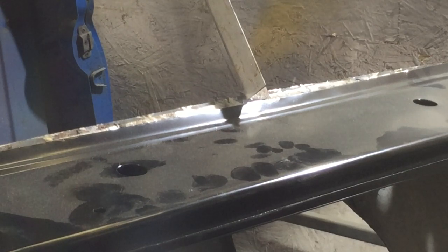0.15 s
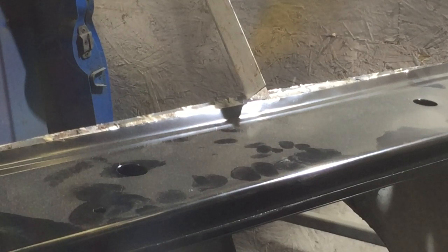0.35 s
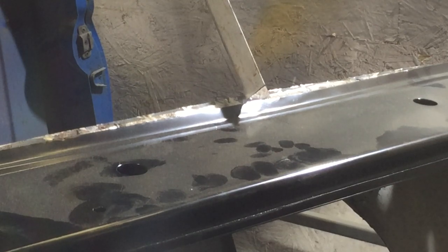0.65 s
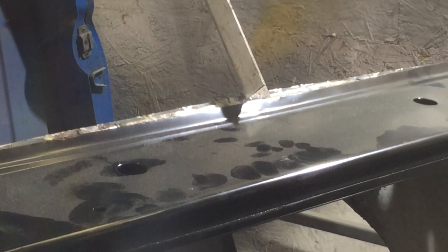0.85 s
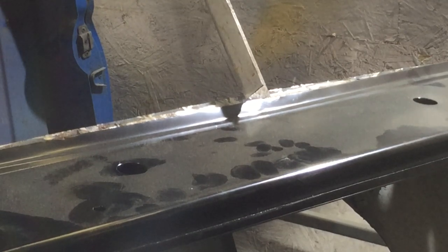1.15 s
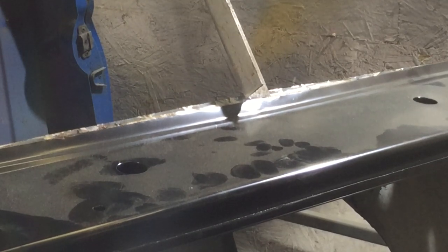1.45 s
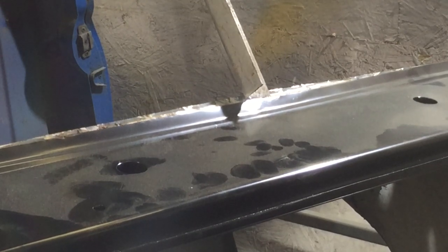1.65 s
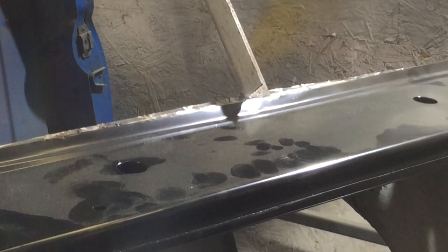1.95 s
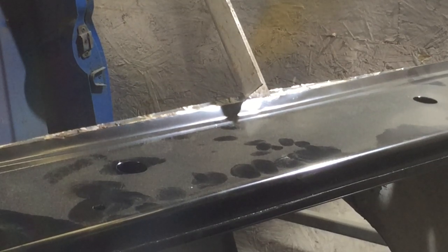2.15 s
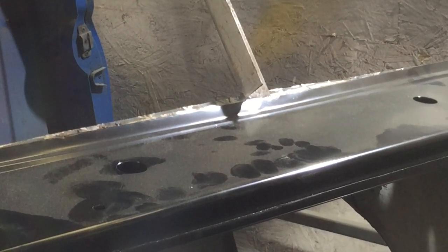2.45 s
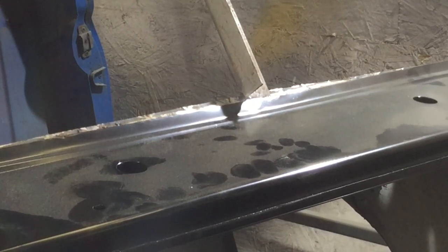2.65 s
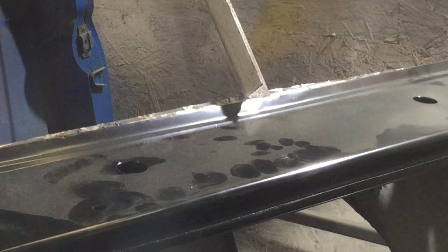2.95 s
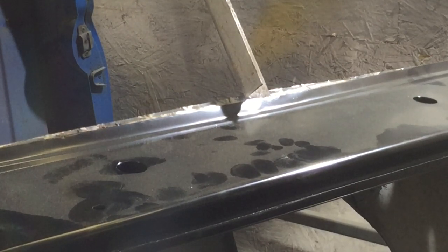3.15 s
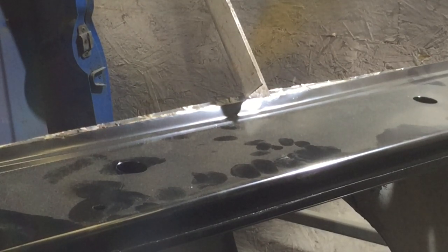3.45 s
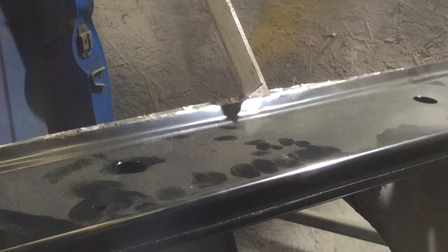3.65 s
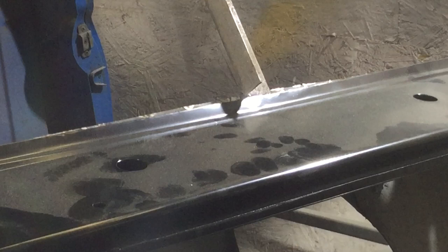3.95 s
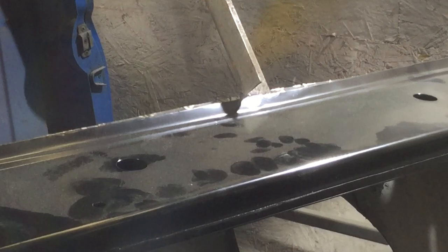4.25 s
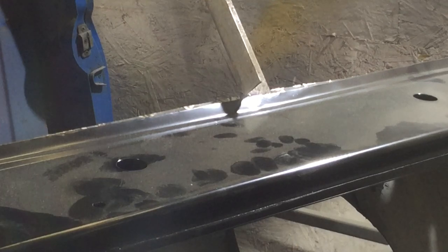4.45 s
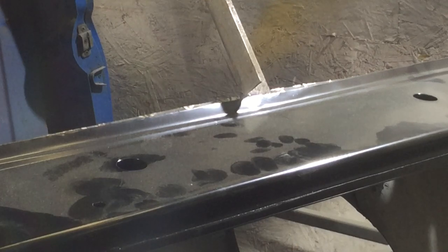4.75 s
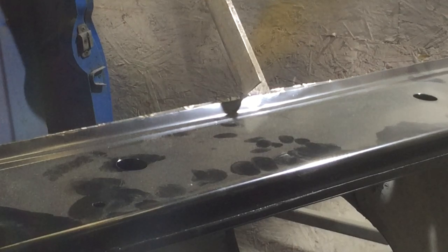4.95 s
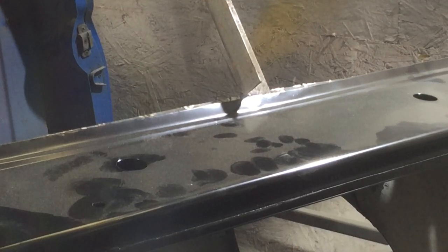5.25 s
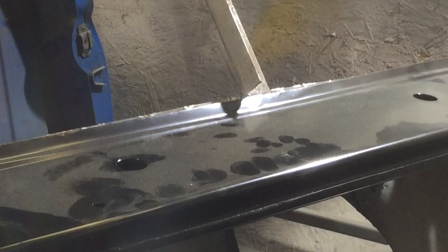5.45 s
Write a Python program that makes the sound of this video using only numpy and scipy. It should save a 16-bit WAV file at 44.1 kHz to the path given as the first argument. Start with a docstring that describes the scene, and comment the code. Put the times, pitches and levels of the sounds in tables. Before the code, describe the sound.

Faint ticks come from a seam in a car body under load. A jack handle clinks in its steel linkage, and the shell suddenly slips with a loud metallic bang. After smaller ticks, knocks and clinks it bangs again, leaving a brief low ring. Heard through one microphone on the metal, the workshop behind it is quiet, with an uneven hum, soft thuds and slight hiss.

```python
"""A workshop, one microphone on a car body being lifted with a hand-pumped jack.
The loaded sheet-metal shell slips, ticks at a seam and twice lets go with a bang; the pump handle
clinks in its steel linkage. Each contact rings the metal's resonances, the bass dying last.
The frame's low, uneven ring swells and fades, mostly just after knocks. Behind it all are a few
soft thuds, the low, uneven hum of the room and a faint microphone hiss."""
import sys
import numpy as np
from scipy import signal
from scipy.fft import rfft, irfft, next_fast_len
from scipy.io import wavfile
from scipy.ndimage import uniform_filter1d

SR = 44100
rng = np.random.default_rng(int(sys.argv[2]) if len(sys.argv) > 2 else 0)


def master(y):
    """Save y as 16-bit WAV."""
    cut = np.clip(np.atleast_2d(y).T, -1, 1)
    pcm = np.round(cut * 32767)  # scale
    wavfile.write(sys.argv[1], SR, pcm.astype(np.int16))


N = 246959


def amp(db):
    """Gain of a level in dB."""
    return 10 ** (np.asarray(db) / 20)


def unit(x):
    """Scaled to rms 1."""
    return x / np.sqrt(np.mean(x ** 2) + 1e-20)


def along(points, hz):
    """Rows of (f/Hz, value) read on a log frequency axis."""
    f, value = np.transpose(points)
    return np.interp(np.log(hz + 1), np.log(f + 1), value)


def filtered(x, response):
    """x through a filter whose gain at f Hz is response(f)."""
    size = next_fast_len(len(x) + 8192)
    return irfft(rfft(x, size) * response(np.fft.rfftfreq(size, 1 / SR)), size)[:len(x)]


def patchy(depth_db, bins, frames):
    """Noise whose level wavers in random patches, bins wide and frames long."""
    spectra = signal.stft(rng.standard_normal(N + 1024), nperseg=1024)[2]
    patches = uniform_filter1d(rng.standard_normal(spectra.shape), bins, axis=0)
    patches = uniform_filter1d(patches, frames, axis=1)
    return signal.istft(spectra * amp(depth_db * unit(patches)), nperseg=1024)[1][:N]


def struck(events, modes, wash, modes_db, spread_db, grain_db, crack_db):
    """Struck metal: each contact cracks and rings a wash of dense modes with resonances above it."""
    # decay of shell and room together, before each contact's decay scale: f/Hz, t60/s
    decay_times = [(100, 1.38), (200, 1.14), (400, 0.6), (800, 0.64), (2000, 0.43), (5000, 0.44),
                   (11000, 0.3)]
    out, t = np.zeros(N + SR), np.arange(SR) / SR
    mode_hz, mode_width, mode_db = np.transpose(modes)[:, :, None]

    def hill(f, centre, width):
        return 1 / (1 + (2 * (f - centre) / width) ** 2) ** 1.2

    for start, db, bass_db, treble_db, favoured, decay_scale, rise_s in events:
        strength = amp(modes_db + mode_db + spread_db * rng.standard_normal(mode_db.shape))
        for hz, lift_db in favoured:
            strength[np.argmin(abs(mode_hz - hz))] = amp(lift_db)
        small_modes_db = grain_db * rng.standard_normal(600)  # new for each contact point

        def tilt(f):  # where the force lands tilts the bass and the treble
            return amp(bass_db / (1 + (f / 950) ** 4) + treble_db / (1 + (4200 / (f + 1)) ** 4))

        def body(f):
            peaks = np.sum(strength * hill(f, mode_hz, mode_width), axis=0)
            # the panel under the contact also lifts the small modes near the favoured ones
            peaks += sum(amp(lift - 12.5) * hill(f, centre, 0.14 * centre) for centre, lift in favoured)
            ripple_db = np.interp(f, np.linspace(0, SR / 2, len(small_modes_db)), small_modes_db)
            return amp(along(wash, f) + ripple_db) * (1 + peaks)

        def crack_colour(f):
            return amp(along(wash, f)) * tilt(f) * f / (f + 3000)

        ringing = filtered(unit(filtered(rng.standard_normal(SR), body)), tilt)
        band_hz, age, spectra = signal.stft(ringing, SR, nperseg=256)
        t60 = np.clip(decay_scale, 0.1, 2) * along(decay_times, band_hz)[:, None]
        fade = amp(-60 * age / t60)
        swell = 1 - np.exp(-age / 0.0044) / (1 + (band_hz[:, None] / 900) ** 2)  # low panels answer late
        ringing = signal.istft(spectra * fade * swell, SR, nperseg=256)[1][:SR]
        crack = amp(crack_db - 60 * t / 0.0067) * unit(filtered(rng.standard_normal(SR), crack_colour))
        onset = 1 - np.exp(-t / np.clip(rise_s, 0.0003, 0.05))
        out[round(start * SR):][:SR] += amp(db) * onset * (ringing + crack)
    return out[:N]


def room_tone():
    """The room's low, lumpy hum over the smooth hiss of the microphone."""
    # course of the hum: t/s, level/dB
    hum_levels = [(0.0, -58), (0.47, -61.5), (0.67, -58), (1.59, -60.5), (2.29, -55), (2.63, -52.5),
                  (2.85, -61), (3.18, -52), (3.63, -60), (3.91, -60), (4.05, -53), (4.32, -59.5),
                  (4.57, -58.5), (5.12, -53), (5.43, -60.5), (5.6, -58)]
    # spectra of the hum and the hiss: f/Hz, relative level/dB
    hum_colour = [(12, -47.5), (20, -8), (60, 0), (139, -1.5), (190, -0.5), (223, -12.5), (276, -10.5),
                  (316, -11.5), (362, -14.5), (500, -43.5), (650, -53.5), (1100, -120)]
    hiss_colour = [(180, -21), (300, -3.5), (487, -19), (779, -6.5), (920, -2.5), (1520, -12),
                   (1650, -10.5), (4990, -18), (8660, -22.5), (15000, -27.5), (16400, -35.5)]
    hum = filtered(patchy(depth_db=4.0, bins=2, frames=3), lambda f: amp(along(hum_colour, f)))
    hiss = filtered(patchy(depth_db=1.2, bins=12, frames=4), lambda f: amp(along(hiss_colour, f)))
    hum_db = np.interp(np.arange(N) / SR, *np.transpose(hum_levels))
    return amp(hum_db) * unit(hum) + amp(-69) * unit(hiss)


def shell_slips():
    """The loaded sheet metal slips, favouring two modes each time; stronger slips ring longer."""
    # slips: t/s, level/dB, bass/dB, treble/dB, mode f/Hz, lift/dB, second mode f/Hz, lift/dB, rise/s
    slips = [(.001, -39.5, -15.5, -7, 477, 16, 2000, 1, 0.0037),
             (.660, -38.5, -15.5, -15, 1740, 1, 690, 4, 0.0012),
             (.748, -37.5, -7.5, -40, 900, 23.5, 1440, 17, 0.0083),
             (2.4506, -7.5, -13, -12.5, 777.6, 8.5, 4120, 8.5, 0.00025),
             (3.128, -49.5, 8, -14, 930, 18, 2080, 14, 0.0079),
             (3.185, -45, 4, -20, 590, 7, 2420, 10, .003),
             (3.288, -57, 8.5, -10.5, 2240, 21.5, 590, 6, .004),
             (3.9036, -30.5, -15, -19.5, 2700, 13.5, 2260, 6.5, 0.00077),
             (3.9409, -26.5, -19, -12, 6500, 14, 3290, 13.5, 0.00033),
             (3.946, -23, -7, -22, 2337, 23, 833, 11.5, 0.0035),
             (4.9122, -12, -12, -13, 2250, 9, 2040, 7.5, 0.0018),
             (5.275, -36, -29, -20, 4120, 18.5, 1430, 13, .003),
             (5.2864, -37.5, 6, -19, 2200, 21, 764, 12, 0.00075)]
    # resonances of the shell: f/Hz, width/Hz, relative level/dB
    modes = [(162, 30, 8), (255, 30, 4), (355, 30, 7), (470, 30, 2), (533, 30, 3), (591, 25, 9),
             (690, 25, 4), (764, 25, 9), (834, 70, 2), (912, 40, 5), (1271, 30, 7), (1352, 30, 8),
             (1430, 25, 6), (1500, 25, 8), (1710, 30, 5), (2080, 35, 6), (2250, 35, 4), (2420, 80, 7),
             (2674, 60, 9), (2874, 120, 10), (3290, 60, 4), (3790, 120, 13), (4120, 250, 14),
             (4400, 100, 10), (5350, 350, 14), (5890, 120, 8), (6370, 150, 9), (6880, 400, 13),
             (7300, 150, 9), (8680, 500, 13)]
    # dense modes between them: f/Hz, relative level/dB
    wash = [(55, -54.5), (90, -14.5), (170, -2.5), (400, -4), (700, -1.5), (1020, -8), (1400, -11),
            (2500, -11.5), (4000, -18), (6000, -13.5), (8700, -18.5), (11000, -30), (15000, -33),
            (17000, -42)]
    decay_scale, scale_per_db = 0.88, 0.009
    events = [(start, db, bass, treble, [(hz, lift), (hz2, lift2)], decay_scale + scale_per_db * db, rise)
              for start, db, bass, treble, hz, lift, hz2, lift2, rise in slips]
    return struck(events, modes, wash, modes_db=-15.5, spread_db=0.5, grain_db=4, crack_db=-3.5)


def seam_ticks():
    """A seam ticks drily, always at the same spot, so all ticks share one favoured mode."""
    # ticks: t/s, level/dB, bass/dB, treble/dB, other favoured mode f/Hz, rise/s
    ticks = [(0.1436, -47.5, -7, 5.5, 1630, .0012), (0.2818, -44.5, -11, 5, 1650, .0005),
             (.3043, -42.5, 4, 5, 1300, 0.001), (0.3984, -46, -10, -2, 1630, .0006),
             (.7858, -34.5, 4, -4, 2860, 0.00038), (0.979, -62.5, -7, 20, 1866, .0012),
             (1.0192, -62.5, 5, 9, 1530, .0012), (1.2446, -59.5, -1, 12, 1530, .0012),
             (1.5497, -63.5, -5, 7, 1530, .0012), (1.7897, -33.5, -6, 7, 1650, 0.0054),
             (1.88, -50, -7, -6, 1530, .008), (3.4142, -46.5, -10, 0.5, 2880, .001),
             (3.4985, -42.5, -13, 0.5, 2930, 0.00062), (3.5758, -38, -8.5, -7, 2940, .0008),
             (3.6257, -40, -3, -11, 1650, 0.0011), (4.27, -61.5, -1, 6, 2146, .0012),
             (4.3775, -46, 0.5, -3.5, 1350, 0.011)]
    # resonances of the seam: f/Hz, width/Hz, relative level/dB
    modes = [(937, 38, 21), (1190, 43, 4.6), (1377, 54, 17), (1530, 61, 6.7), (1630, 150, 3.5),
             (1866, 88, 4.5), (2050, 65, 3), (2220, 86, 8), (2500, 200, 5.7), (2910, 120, 15),
             (3450, 77, 7.5), (3750, 30, 1.6), (4270, 32, 2.7), (5250, 150, 6.3)]
    # dense modes between them: f/Hz, relative level/dB
    wash = [(240, -48.5), (400, -11.5), (723, -5.5), (828, -20.5), (1090, -4.5), (1270, -14), (1540, -6.5),
            (2320, -6.5), (4390, -20.5), (15000, -46.5)]
    shared_hz, shared_db, other_db, decay_scale = 2340, 4.5, 11, 0.7
    events = [(start, db, bass, treble, [(shared_hz, shared_db), (hz, other_db)], decay_scale, rise)
              for start, db, bass, treble, hz, rise in ticks]
    return struck(events, modes, wash, modes_db=-8.5, spread_db=0.5, grain_db=5.0, crack_db=-13)


def thuds():
    """Soft low pushes, a few cycles each."""
    # thuds: centre t/s, level/dB, f/Hz
    pushes = [(0.15, -47, 61.7), (0.549, -48, 108), (1.099, -47.5, 63), (3.026, -43.5, 57.3),
              (4.147, -44, 137), (5.439, -48, 193), (2.061, -47, 148)]
    t = np.arange(N) / SR
    return sum(amp(db) * np.exp(-((t - centre) / 0.015) ** 2) * np.sin(2 * np.pi * hz * (t - centre))
               for centre, db, hz in pushes)


def handle_clinks():
    """The pump handle knocks in its steel linkage and rings brightly."""
    # clinks: t/s, level/dB, bass/dB, treble/dB, mode f/Hz, lift/dB, second mode f/Hz, decay scale
    clinks = [(.733, -50, 2, -9, 6610, 20, 3940, 0.48), (2.118, -70, -11.5, 1, 6610, 26, 6610, .8),
              (2.189, -44, -6, -21.5, 2340, 18, 4000, .65), (2.198, -40.5, 2.5, -12, 8300, 27, 5530, 0.83),
              (2.2745, -31.5, -8, -11, 3610, 24, 3235, 0.88), (3.118, -44, -11, -6.5, 5480, 22, 4640, 0.74),
              (4.592, -40.5, -5.5, 2.5, 4900, 12, 6300, 0.69),
              (4.600, -31, 5.5, -3, 5320, 30.5, 8500, 0.83),
              (4.681, -29, -11.5, -10.5, 3500, 19.5, 3220, 0.68),
              (5.174, -32.5, -7, -21.5, 6610, 25, 3360, 1.02),
              (5.259, -32.5, -11, -11, 6150, 20.5, 3900, 0.73)]
    # resonances of the handle: f/Hz, width/Hz, relative level/dB
    modes = [(450, 28, 8), (590, 35, 6), (750, 50, 6), (920, 50, 6), (1365, 35, 7), (1700, 35, 4),
             (2000, 45, 7), (2310, 80, 7), (3240, 60, 10), (3550, 90, 9), (3940, 45, 4), (4690, 45, 7),
             (4850, 90, 9), (5460, 190, 8), (5730, 60, 5), (6250, 80, 8), (6610, 110, 5), (7020, 110, 11),
             (7810, 100, 8), (8050, 100, 8), (8480, 110, 14), (9770, 120, 15), (10750, 120, 15),
             (11700, 150, 13)]
    # dense modes between them: f/Hz, relative level/dB
    wash = [(90, -37), (150, -6), (450, -3.5), (950, -7), (1400, -10.5), (2300, -11.5), (3600, -16.5),
            (5500, -13.5), (8500, -25), (12000, -32.5), (16000, -43.5)]
    second_db, rise_s = 20.5, 0.0017
    events = [(start, db, bass, treble, [(second_hz, second_db), (hz, lift)], decay_scale, rise_s)
              for start, db, bass, treble, hz, lift, second_hz, decay_scale in clinks]
    return struck(events, modes, wash, modes_db=3, spread_db=1.5, grain_db=3.0, crack_db=-14)


def frame_ring():
    """The frame's low, uneven ring swells fast and fades more slowly, mostly just after knocks."""
    # resonances of the frame: f/Hz, width/Hz, relative level/dB
    modes = [(440, 31, 7), (571.6, 60, 7), (730, 25, 2.5), (938, 33, 2), (1343, 873, -14),
             (2150, 200, -10.5)]
    # peaks of the ring: t/s, level/dB
    peaks = [(.86, -74), (1.81, -60.5), (2.26, -48), (2.699, -55), (2.88, -59), (3.25, -59.5), (4.04, -66),
             (4.77, -48.5), (4.98, -40.5), (5.21, -52), (5.4, -73)]
    rest_db, swell_db_per_s, fade_db_per_s = -73.5, 253, 121.5

    def frame(f):
        return sum((-1) ** k * amp(db) * 1j * f * width / (hz * hz - f * f + 1j * f * width)
                   for k, (hz, width, db) in enumerate(modes))

    t = np.arange(N) / SR
    swells = sum(amp(db + np.minimum(swell_db_per_s * (t - peak), fade_db_per_s * (peak - t)))
                 for peak, db in peaks)
    ring = filtered(patchy(depth_db=6.0, bins=4, frames=3), frame)
    return (amp(rest_db) + swells) * unit(ring)


def scene():
    """Car body, jack and room at one microphone."""
    metal = shell_slips() + amp(-4.0) * seam_ticks() + amp(-1.5) * handle_clinks() + frame_ring()
    return (metal + thuds() + room_tone())[None]


def record(dry):
    """The recorder keeps nothing above its band limit and little of the deepest bass."""
    low_cut_hz, top_hz = 30, 15780
    return filtered(dry[0], lambda f: (f < top_hz) / (1 + (low_cut_hz / (f + 1)) ** 4))[None]


dry = scene()
out = record(dry)
master(out)
```